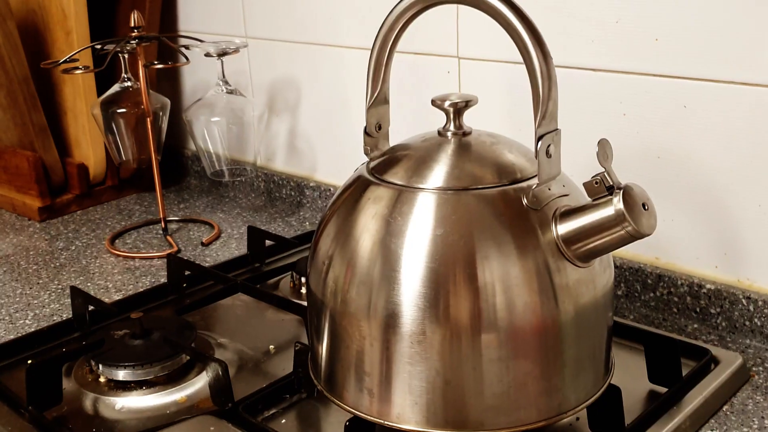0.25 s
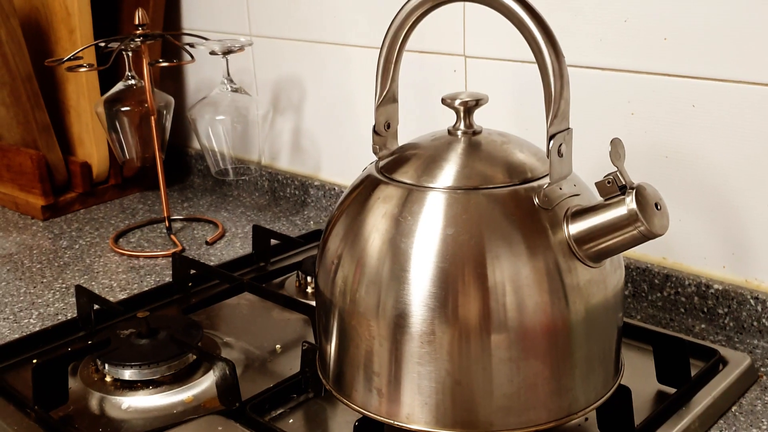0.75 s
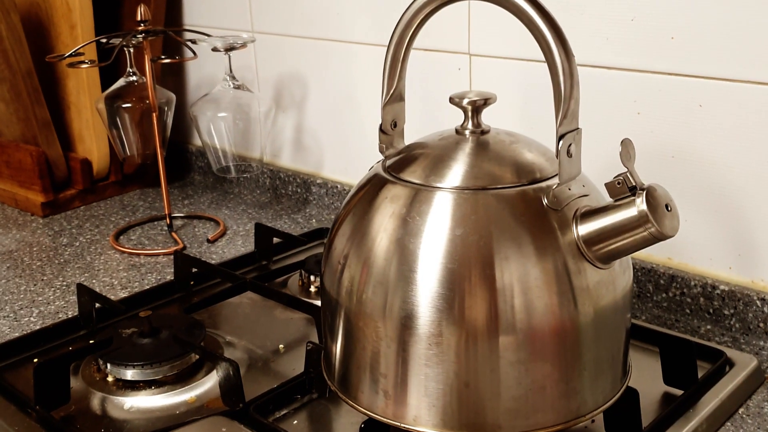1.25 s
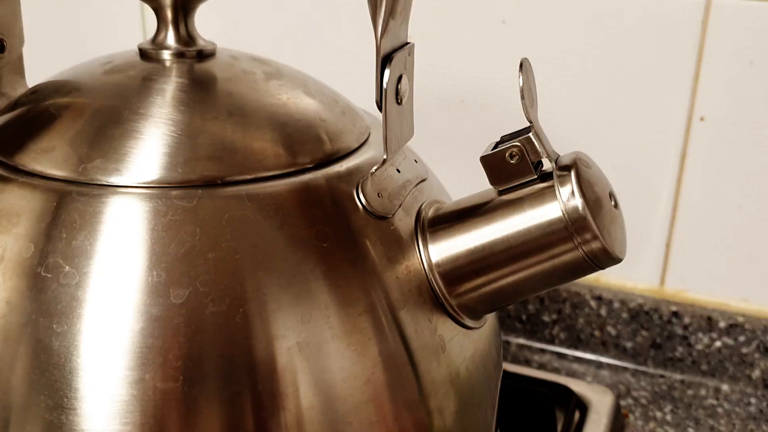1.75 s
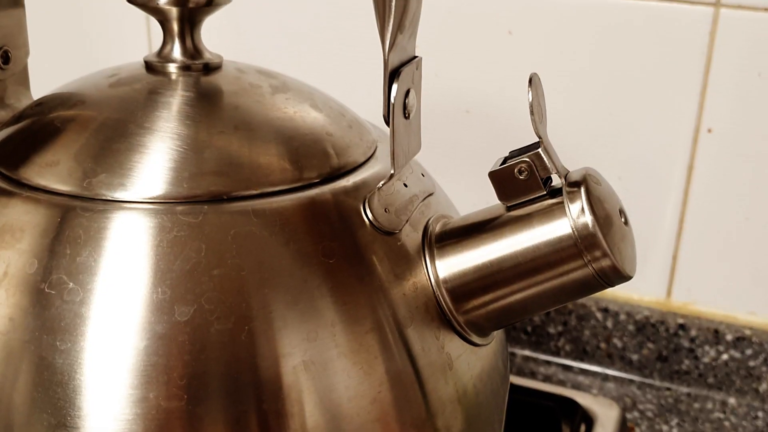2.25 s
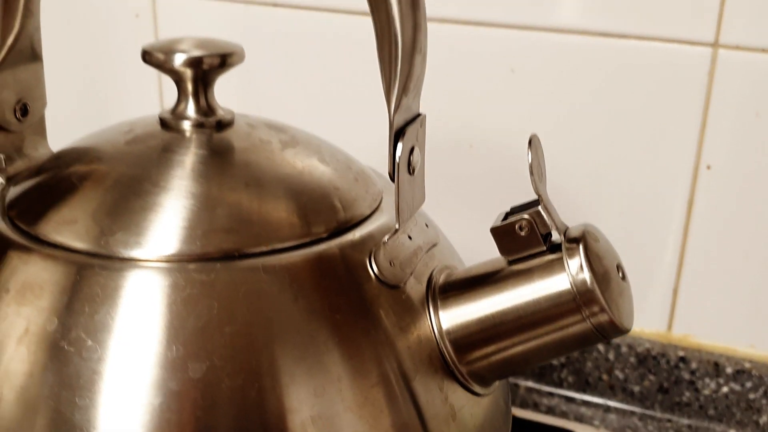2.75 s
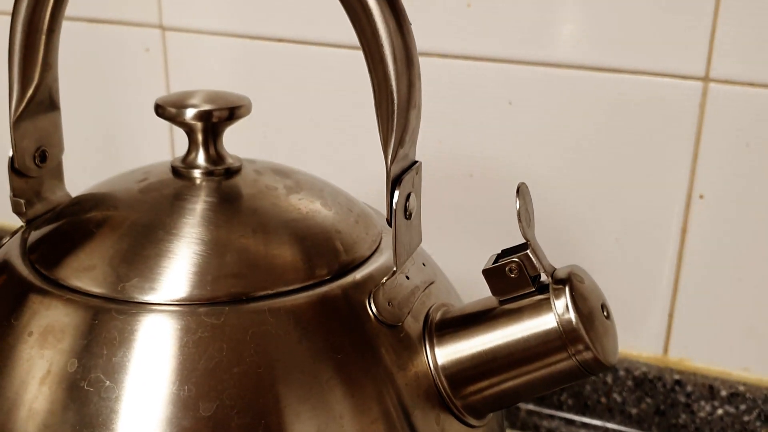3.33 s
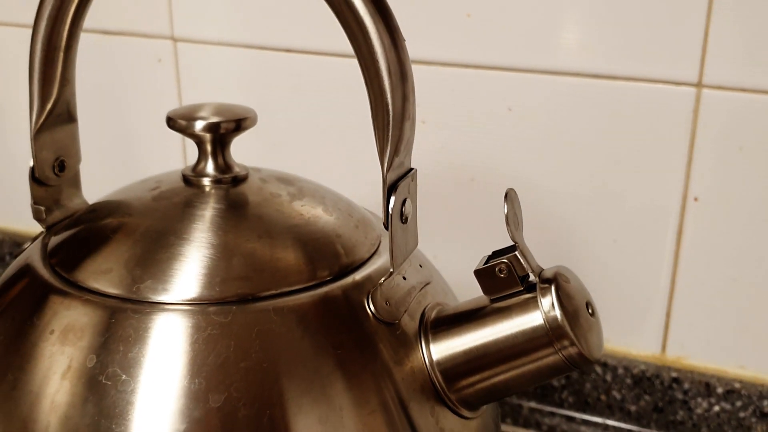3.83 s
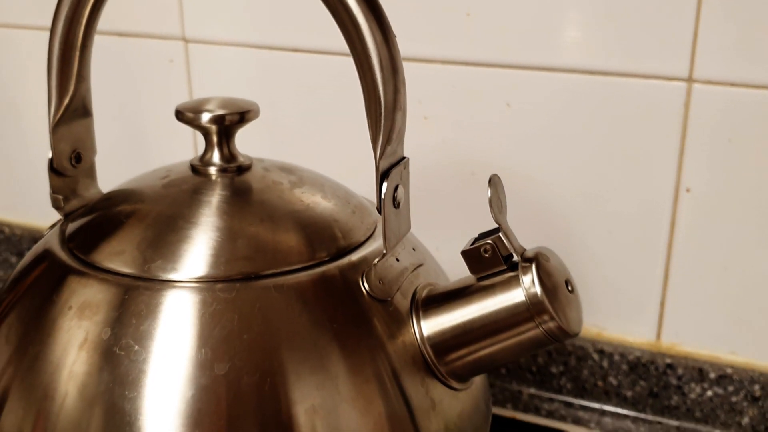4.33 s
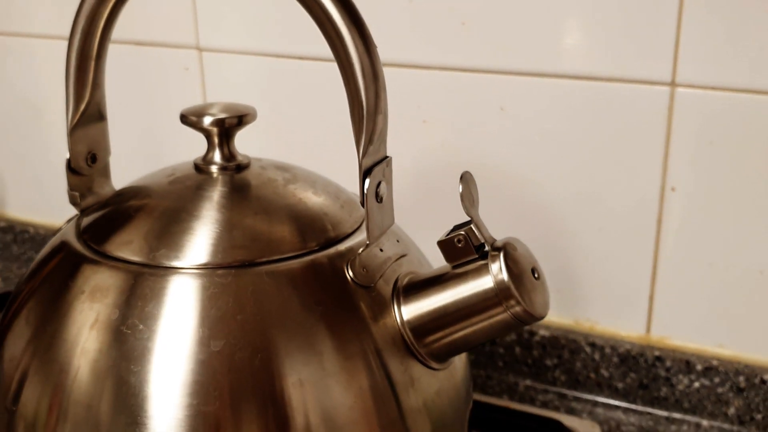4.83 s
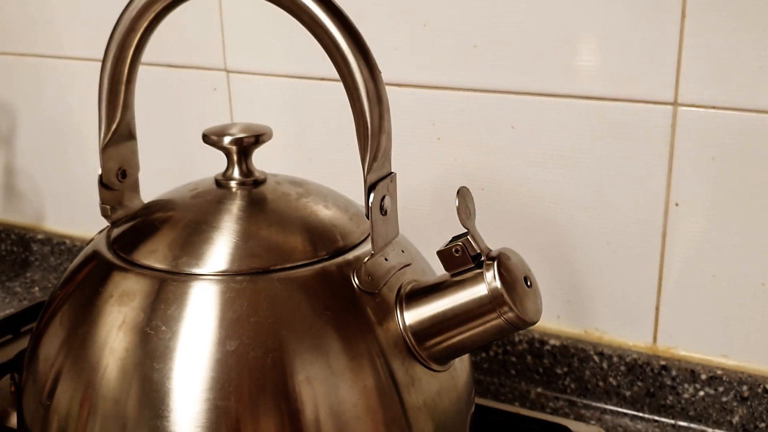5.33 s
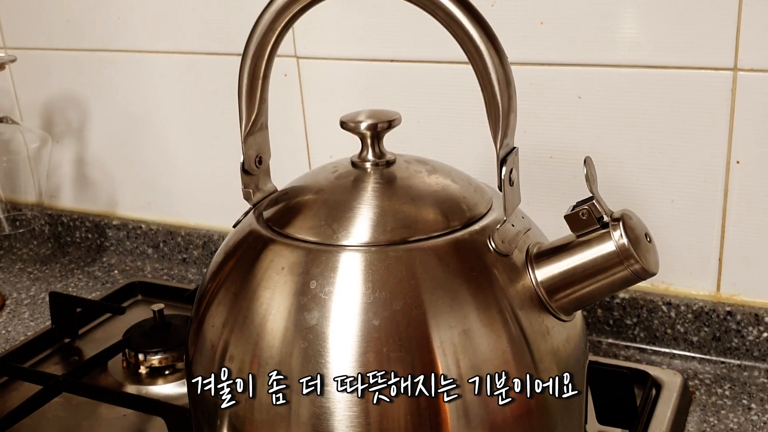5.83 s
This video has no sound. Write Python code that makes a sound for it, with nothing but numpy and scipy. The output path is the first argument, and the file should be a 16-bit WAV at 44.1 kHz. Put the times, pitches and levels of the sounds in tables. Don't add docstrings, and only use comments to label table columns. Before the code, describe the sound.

Metal kettle on a gas ring in a small tiled kitchen, heard in four abruptly cut pieces: a fraction of a second of water roar; a shrill whistle with hiss and soft bubbling knocks, hopping up to a higher note and back; a stronger whistle close to the microphone, pitch wobbling and rising with rough steam; finally a faint, low, dying whistle over muffled simmering. Short gaps separate the first three.

```python
import sys
import numpy as np
from scipy import signal
from scipy.fft import rfft, irfft, next_fast_len
from scipy.io import wavfile

SR = 44100
rng = np.random.default_rng(int(sys.argv[2]) if len(sys.argv) > 2 else 0)


def undo_db(level):
    steps = np.asarray(level, float) / 20
    return 10 ** steps


def file_out(sig):
    cols = np.atleast_2d(sig).T
    lim = np.clip(cols, -1, 1)
    pcm = np.round(lim * 32767).astype(np.int16)
    wavfile.write(sys.argv[1], SR, pcm)


N = 267995
TIME = np.arange(N) / SR

# [start t/s, end t/s]
STRETCHES = [
    (0, .1367),
    (.1968, 1.8053),
    (1.8546, 5.7672),
    (5.7672, 6.077),
]


def during(k):
    start, end = STRETCHES[k]
    return (TIME >= start) & (TIME < end + .02 * (k < 2))


def rms_one(x):
    return x / np.sqrt(np.mean(x ** 2) + 1e-20)


def in_time(rows):
    s, *columns = np.transpose(rows)
    gate = np.clip(np.minimum(TIME - s[0], s[-1] - TIME) / .004 + 1, 0, 1)
    return [np.interp(TIME, s, c) for c in columns], gate


def bumps(events):
    out = np.zeros(N)
    for s, height, ms in events:
        near = slice(round((s - .1) * SR), round((s + .1) * SR))
        out[near] += height * np.exp(-np.log(16) * ((TIME[near] - s) * 1000 / ms) ** 2)
    return out


def at_hz(points, hz):
    f, value = np.transpose(points)
    return np.interp(np.log(hz), np.log(f), value)


def drift(rate_hz, size=N):
    r = np.exp(-32 * np.pi * rate_hz / SR)
    slow = signal.lfilter([1], [1, -2 * r, r * r], rng.standard_normal(size // 16 + 2002))[2000:]
    return np.interp(np.arange(size) / 16, np.arange(len(slow)), rms_one(slow - slow.mean()))


def sides(pan_db):
    return undo_db(np.array([pan_db / 2, -pan_db / 2])) / np.cosh(pan_db * np.log(10) / 40)


# [f/Hz, correlation]
LIKENESS = [(30, 0.89), (125, 1), (300, 0.51), (1000, 0.35), (4000, 0.36), (12000, 0.35)]
# [f/Hz, left over right level/dB]
TILT = [(30, -2.5), (200, -2.5), (1000, 0), (4000, -7), (8000, 2.5), (13000, -4.5)]


def noise(spectrum, modes=(), echo=0.45):
    size = next_fast_len(N)
    hz = np.maximum(np.arange(size // 2 + 1) * SR / size, 1)
    gain = undo_db(at_hz(spectrum, hz)) * (hz > spectrum[0][0] / 2)
    lift = sum(undo_db(2 * db) / (1 + (2 * (hz - f) / width) ** 2) for f, width, db in modes)
    gain = gain * np.sqrt(1 + lift)
    alike = np.clip(at_hz(LIKENESS, hz), 0, .99)
    mid, side = rfft(rng.standard_normal((2, size)))
    pair = np.sqrt(1 + alike) * mid + np.sqrt(1 - alike) * side * [[1], [-1]]
    out = irfft(pair * gain * sides(at_hz(TILT, hz)), size)[:, :N]
    lags = rng.integers(20, 420, (5, 1)) + rng.integers(0, 9, (5, 2))
    out = out + echo * np.array([sum(np.roll(out[c], lag) for lag in lags[:, c]) for c in range(2)])
    return out / np.std(out.mean(axis=0))


def whistle(gate, hz, levels, pans, leads, waver, flutter_db, blur):
    phase = 2 * np.pi * np.cumsum(hz * (1 + waver * (drift(36.8) + .5 * drift(164)))) / SR
    pans = pans + [-3, -1.5, 1.2]
    leads = leads + [-1.4, -.3, -.5]
    steady, out = 0 * hz, np.zeros((2, N))
    sounding = np.flatnonzero(gate)
    on = slice(sounding[0], sounding[-1])
    size = on.stop - on.start
    for k, db in enumerate(levels):
        j = min(k, 4)
        flutter = (flutter_db + steady)[on] * (1 + 0.27 * k) * (drift(33, size) + 1.42 * drift(86, size))
        slip = (blur + steady)[on] * k ** 2 * drift(60, size)
        apart = np.array([[.5], [-.5]]) * ((leads[j] + steady)[on] + .5 * drift(8.1, size))
        gain = np.sqrt(2) * undo_db(db[on] + flutter) * sides((pans[j] + steady)[on])
        out[:, on] += gain * np.sin((k + 1) * phase[on] + slip + apart)
    return gate * out, phase


# [t/s, depth level/dB, width/ms]
BEATS = [(.402, -10, 9.7), (.534, -4, 11), (.707, -9, 14), (.724, -12, 10), (.747, -7, 7.3),
         (.772, -6.5, 20), (.822, -10, 9), (.853, -8, 21), (.884, -21, 3.5), (.94, -18.5, 7.7),
         (.958, -15, 9.9), (.985, -6, 9), (.999, -24, 2.4), (1.034, -28, 13), (1.136, -9, 18),
         (1.311, -22, 6.8), (1.439, -28, 6.4), (1.702, -23, 7.9), (1.741, -23, 20), (2.323, -12, 6.3),
         (2.708, -15, 29), (2.838, -12, 8), (2.89, -13, 11), (2.953, -12, 19), (5.821, -6.5, 7.7),
         (5.844, -11, 8.3), (5.888, -10, 15), (5.902, -14, 5.5), (5.933, -12, 5.3)]


def far_echo_beats():
    return bumps(BEATS)


# [start t/s, end t/s, 2nd partial level/dB, 3rd level/dB, 4th level/dB]
LOW_MODE = [
    (0.198, 0.662, -39.5, -70, -84),
    (1.012, 1.8, -40.5, -65.5, -70.5),
    (1.85, 5.775, -40, -51, -66.5),
]
# [t/s, f/Hz]
PITCH = [(0.195, 2101), (0.573, 2095), (0.659, 2048), (1.012, 2117), (1.101, 2198), (1.292, 2131),
         (1.6, 2181), (1.643, 2093), (1.805, 2146), (1.853, 2246), (2.24, 2251), (2.415, 2329),
         (2.563, 2247), (2.9, 2314), (3.161, 2226), (4.412, 2252), (5.088, 2275), (5.77, 2389)]
# [t/s, pitch step f/Hz, width/ms]
SURGES = [(1.163, 30.5, 19.4), (1.236, 33, 35), (1.69, 19, 46), (1.937, 21, 45), (2.285, 51, 32.4),
          (2.793, -25.5, 80), (3.341, 30.5, 34), (3.45, 28.5, 37), (3.548, 35, 42), (3.639, 44, 43),
          (3.739, 39, 18), (3.909, 35.5, 65), (4.006, -29, 22.3), (4.212, -32.5, 53), (4.445, -24.5, 46),
          (4.539, 47, 45), (4.651, 67, 29), (4.685, 43.5, 44), (4.72, 48, 33), (4.798, 71, 27.7),
          (4.859, 47.5, 42), (4.933, 109.5, 73), (5.049, 77.5, 61), (5.24, 53, 77), (5.336, 36.5, 21),
          (5.394, 62, 39), (5.465, -31, 35.7), (5.616, 43.5, 36.4), (5.731, 60.5, 10), (5.75, -67, 20.3)]
# [t/s, level/dB]
LOW_MAIN = [(.197, -40), (.66, -42), (1.011, -41.5), (1.806, -45), (1.855, -36), (3.16, -34.5),
            (5.77, -33.5)]
# [t/s, 1st L-R level/dB, 2nd L-R level/dB, 2nd lead/rad]
LOW_SIDE = [(0.2, -10, -10, -2), (1.45, 7.5, -7.5, -1.15), (1.64, -2.5, -10, -0.59), (4.51, -5, -12, 0.037),
            (5.77, -4.5, -1, -0.99)]
# [t/s, share of the direct sound]
ECHO = [(.197, 0.25), (1.806, 0.22), (1.855, 0.61), (2.95, 0.29), (3.13, 0.014), (5.77, 0.024)]
# [t/s, depth level/dB]
OVERTONE_DIPS = [(.3, -4), (.38, -3), (.6, -8), (.65, -11), (2.88, -5), (2.95, -11), (2.99, -10.5),
                 (4.04, -3), (4.221, -13), (4.45, -14), (4.77, -8), (4.825, -7), (5.1, -14)]
# [t/s, level/dB, width/ms]
CLEAREST = [
    (4.32, 6, 100),
    (4.42, 6.5, 110),
]


def low_mode(beats_db):
    wander_hz, echo_s, dip_ms = 4.5, .0068, 23.3
    hz = in_time(PITCH)[0][0] + bumps(SURGES) + wander_hz * drift(22.2)
    pan1, pan2, lead2 = in_time(LOW_SIDE)[0]
    second, third, fourth = in_time([(s, *db) for t0, t1, *db in LOW_MODE for s in (t0, t1)])[0]
    rough = np.clip((hz - 2262) / 45, 0, 1.2)
    share = np.clip(in_time(ECHO)[0][0], 0, .9)
    echo_db = 20 * np.log10(np.abs(1 + share * np.exp(2j * np.pi * hz * echo_s)))
    first = in_time(LOW_MAIN)[0][0] + echo_db + beats_db - 0.44 * rough
    dips_db = bumps([(s, db, dip_ms) for s, db in OVERTONE_DIPS])
    second = second + dips_db - 0.88 * rough - 1.9 * share
    third = third + 0.57 * drift(4.6) - 0.82 * rough + 4.3 * share + bumps(CLEAREST)
    levels = [first, second, third, fourth, fourth - 5, fourth - 8]
    sounding = sum(in_time([(t0,), (t1,)])[1] for t0, t1, *db in LOW_MODE)
    sounding += undo_db(-13 - 220 * np.abs(TIME - .664)) * (TIME > .664) * (TIME < .78)
    waver = .0021 * (1 + 1.5 * rough)
    flutter_db = .55 * (1 + .5 * rough + 1.0 * share + 1.3 * rough * share)
    blur = .1 * (1 + 1.3 * rough)
    tone, phase = whistle(sounding, hz, levels, [pan1, pan2], [-.2, lead2], waver, flutter_db, blur)
    eddying = sounding * np.where(during(2), 0.51 + 0.39 * rough, 1)
    return tone, phase, eddying


# [t/s, f/Hz, level/dB, L-R level/dB]
HIGH_MODE = [
    (.658, 3326, -50, 4),
    (.68, 3230, -45, 9),
    (.72, 3310, -40, 7),
    (.81, 3373, -36.5, -8.5),
    (.93, 3456, -40, -13),
    (.985, 3450, -38.5, -11),
    (1.006, 3520, -36.5, -4),
    (1.018, 3480, -41, -3),
]


def high_mode(beats_db):
    (hz, first, pan), gate = in_time(HIGH_MODE)
    second = -68.5 + 0 * hz
    levels = [first + beats_db, second, second - 13]
    return whistle(gate, hz, levels, [pan, 1.5], [-.9, -.6], waver=0.004, flutter_db=1.14, blur=.3)[0]


# [t/s, f/Hz, 1st partial level/dB, 2nd level/dB]
DYING = [
    (5.77, 975, -60.5, -40),
    (5.785, 987, -63, -53),
    (5.89, 995, -58, -49.5),
    (5.935, 982, -65, -49),
    (5.96, 940, -73, -45.5),
    (5.975, 960, -65, -50),
    (5.985, 1016, -60, -54.5),
    (6.02, 1030, -60, -58),
    (6.077, 1010, -57, -58),
]


def dying(beats_db):
    (hz, first, second), gate = in_time(DYING)
    third = -69.5 + 0 * hz
    levels = [first, second + beats_db, third, third - 6, third - 13, third - 20]
    return whistle(gate, hz, levels, [-2.5, 4], [.3, -.4], waver=0.0042, flutter_db=1.07, blur=0.07)[0]


# [t/s, level/dB]
JET = [(.197, -74.5), (.66, -77), (.7, -103), (.8, -93), (.985, -83.5), (1.012, -74), (1.806, -74.5),
       (1.855, -74), (2.1, -70), (2.35, -66.5), (2.9, -64.5), (3.1, -69), (3.5, -66), (4.3, -68.5),
       (5.05, -64), (5.77, -65.5)]
# [t/s, depth level/dB, width/ms]
LULLS = [(2.6, -7, 95), (2.78, -7.5, 49), (3.4, -2.5, 40), (4.2, -5.5, 72), (4.46, -4, 50), (4.58, -4, 50),
         (4.78, -4, 57), (5.14, -4, 90)]
# [f/Hz, level/dB per Hz]
FAR_HISS = [(1500, -31), (2500, 0.5), (2900, -5), (3300, 4.5), (4500, -2), (6000, -6), (8000, -13.5),
            (10000, -20), (12000, -27)]
# [f/Hz, level/dB per Hz]
HISS = [(1500, -39.5), (2500, -4), (2760, -10), (3000, -6), (3300, -3.5), (4500, -3.5), (6000, -3),
        (8000, -8), (10000, -25), (12000, -42)]
# [f/Hz, width/Hz, level over the hiss/dB]
SPOUT = [(4000, 280, 0.5), (4960, 130, 5.5), (7520, 150, -1)]
# [f/Hz, level/dB per Hz]
SIZZLE = [(6000, -20), (9500, -8), (12000, -3.5), (14000, -12), (15600, -13)]
# [t/s, level/dB]
BREATH = [
    [(0.2, -59), (1.284, -60), (1.79, -57)],
    [(1.87, -80), (1.88, -63), (3.49, -60.5), (5.7, -81), (5.73, -88.5)],
]
# [f/Hz, level/dB per Hz]
IDLE = [(1400, -22.5), (1750, -14), (1880, 4.5), (2020, 2.5), (2150, -1), (2600, -63), (3000, -58)]


def jet(phase, eddying):
    sizzle_db = in_time(JET)[0][0] + bumps(LULLS)
    backing_off_db = 1.46 * np.maximum(TIME - STRETCHES[2][0], 0)
    hiss_db = -62.5 + 0.71 * (sizzle_db + 76) - backing_off_db
    gust = drift(24)
    hiss = undo_db(9.0) * during(1) * noise(FAR_HISS, SPOUT) + undo_db(9.5) * during(2) * noise(HISS, SPOUT)
    for half, db in [(3, 0.0), (5, -22), (7, -21.0)]:
        turn = half * phase / 2
        eddies = np.array([drift(36) * np.cos(turn) + drift(36) * np.sin(turn) for side in range(2)])
        hiss += undo_db(db) * eddying * (eddies + 0.38 * eddies[1])
    breath_db = in_time(sum(BREATH, []))[0][0] + 1.0 + 2.14 * gust
    breath = undo_db(breath_db) * noise(IDLE)
    sizzle = undo_db(sizzle_db + 5.5 + 2.4 * gust) * noise(SIZZLE)
    return undo_db(hiss_db + 1.29 * gust) * hiss + sizzle + breath


# [t/s, level/dB]
THUMPS = [
    (0.33, -60),
    (.465, -65),
    (.577, -90),
    (.877, -74.5),
    (0.917, -69),
    (.987, -68),
]
# [f/Hz, level/dB, t60/s]
BODY = [(340, -6, 0.053), (520, -6, 0.047), (783, 5.5, 0.039), (1015, -2, 0.036), (1110, -12, 0.023)]


def thumps():
    burst = sum(undo_db(db - 27 - 123 * np.abs(TIME - s)) * (TIME > s) for s, db in THUMPS)
    burst = burst * rng.standard_normal(N)
    out = 0
    for hz, level_db, t60 in BODY:
        r, w = undo_db(-60 / (t60 * SR)), 2 * np.pi * hz / SR
        strike = [0, undo_db(level_db) * np.sin(w)]
        out = out + signal.lfilter(strike, [1, -2 * r * np.cos(w), r * r], burst + 1e-18)
    return out


# [f/Hz, level/dB per Hz]
ROAR = [(35, -45), (60, -14), (263, -14.5), (339, -18.5), (526, -4), (1330, -10.5), (1490, -8.5),
        (3420, -26.5), (3660, -20.5), (15000, -50.5)]


def roar():
    return undo_db(-51.5 + 0.51 * drift(40)) * noise(ROAR, echo=0.041) * during(0)


# [f/Hz, level/dB per Hz]
SIMMER = [(30, -14), (120, -1), (220, -8), (330, 4), (470, -13), (700, 3.5), (1500, -15), (5000, -25),
          (8000, -25.5), (12000, -58)]


def simmer():
    return undo_db(-68.5 + 2.43 * drift(17)) * noise(SIMMER, echo=0.097) * during(3)


# [f/Hz, level/dB per Hz]
FLAME = [(15, -46), (25, -17), (48, -2.5), (124, 1), (220, -7.5), (301, -8), (340, -3), (419, -15.5),
         (490, -5.5), (840, -11), (1340, -4.5), (1600, -12), (2080, -26), (3520, -120)]
# [level/dB from afar, level/dB from close]
FLAME_DB = [-70, -69.5]


def flame():
    level_db = np.where(during(1), *FLAME_DB) + 2.2 * drift(8.5)
    return undo_db(level_db) * noise(FLAME, echo=0.068) * (during(1) | during(2))


def kitchen(x, t60):
    size = next_fast_len(N + SR // 2)
    turn = -2j * np.pi * np.arange(size // 2 + 1) / size
    walls = np.zeros((2, len(turn)), complex)
    lags = (rng.uniform(.012, .035, 16) * SR).astype(int)
    for k, lag in enumerate(lags):
        loop = undo_db(-60 * lag / SR / t60) * np.exp(turn * lag)
        walls[k % 2] += loop / (1 - loop) * (-1) ** (k // 2)

    def ring(part):
        return irfft(walls * rfft(part, size), size)[:, :N]

    last = during(3)
    return ring(x * ~last) * ~last + ring(x * last)


def scene():
    beats_db = far_echo_beats()
    low, phase, eddying = low_mode(beats_db)
    boil = during(1) | during(2)
    tone = boil * (low + high_mode(beats_db)) + during(3) * dying(beats_db)
    steam = boil * jet(phase, eddying) + thumps()
    wet = kitchen(undo_db(-18) * tone.mean(axis=0) + undo_db(-16) * steam.mean(axis=0), t60=.24)
    spout = tone + steam + wet
    hollow = signal.lfilter(*signal.iirnotch(2800, 6.5, SR), spout)
    return np.where(during(2), hollow, spout) + flame() + roar() + simmer()


def roll_off(x):
    return signal.sosfilt(signal.butter(12, 16470, fs=SR, output="sos"), x)


def record(dry):
    gate = sum((TIME >= t0) & (TIME < t1) for t0, t1 in STRETCHES).astype(float)
    for (t0, t1), trace_db in zip(STRETCHES, [-21, -45]):
        gate += undo_db(trace_db - 550 * (TIME - t1)) * (TIME >= t1) * (TIME < t1 + .017)
    top = signal.ellip(10, .2, 70, 15690, fs=SR, output="sos")
    return roll_off(signal.sosfilt(top, dry) * gate)


dry = scene()
out = record(dry)
file_out(out)
```